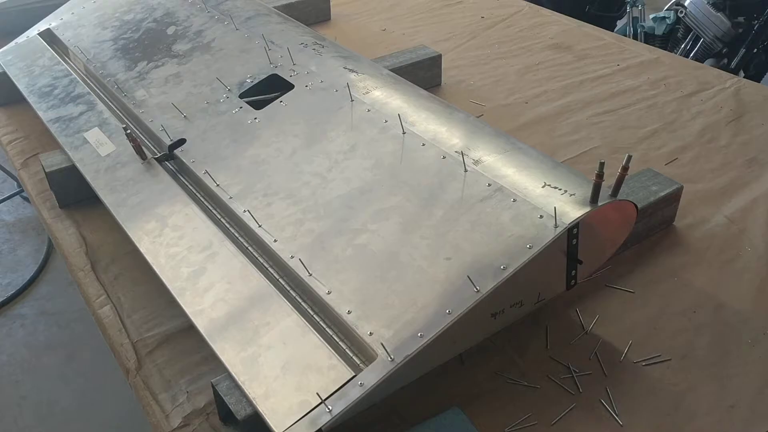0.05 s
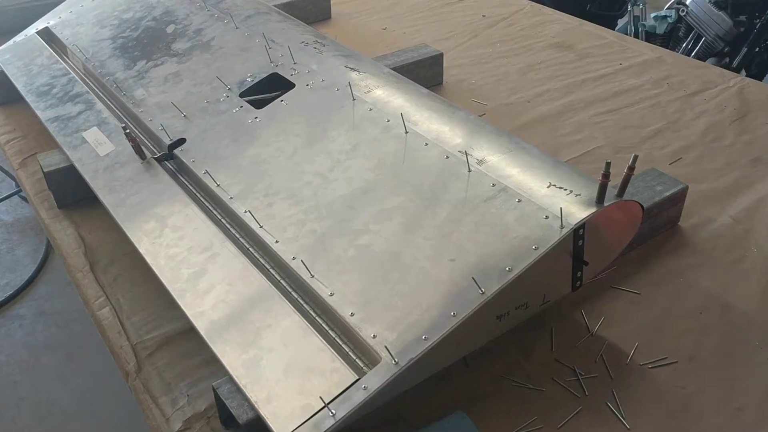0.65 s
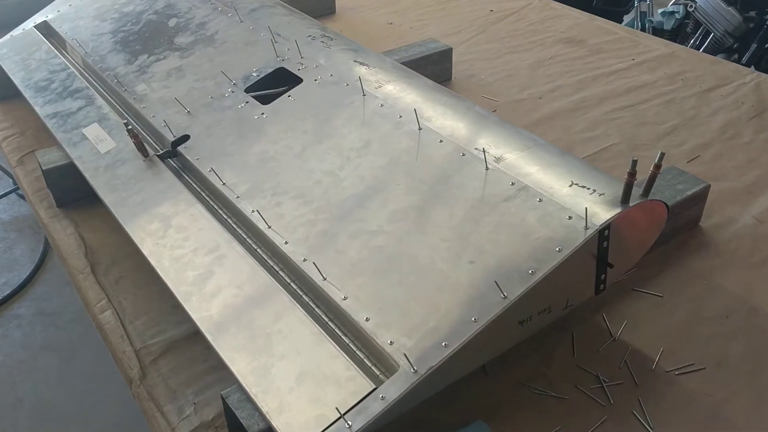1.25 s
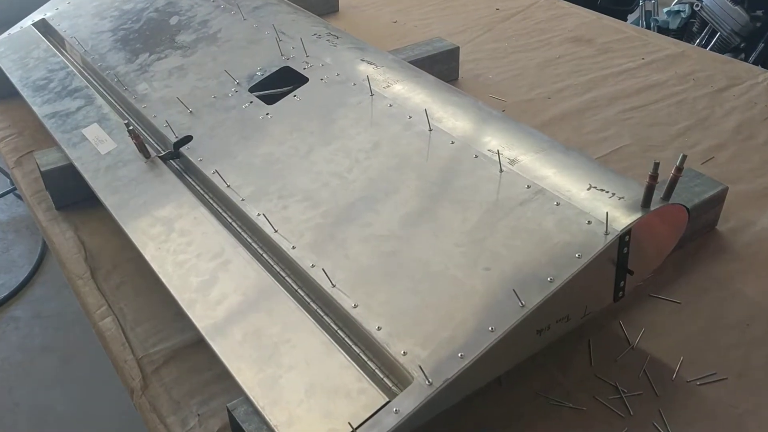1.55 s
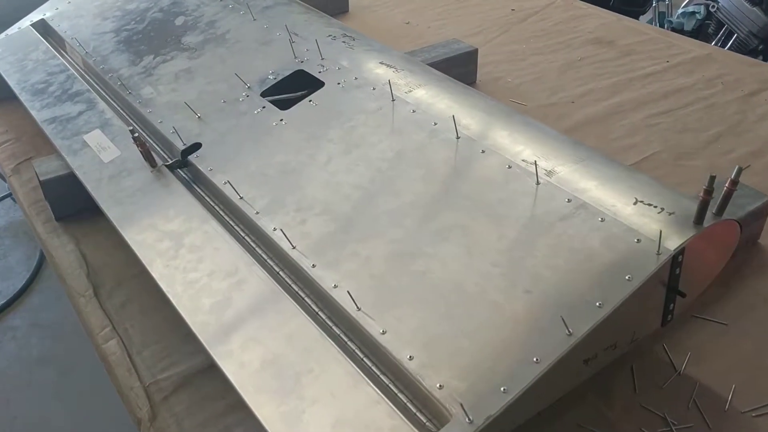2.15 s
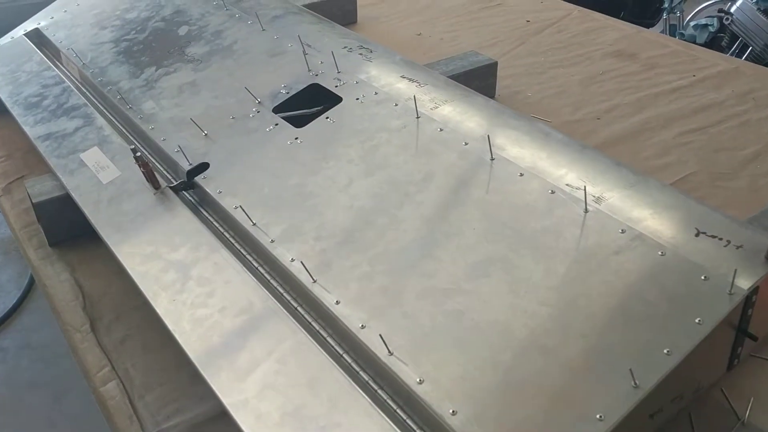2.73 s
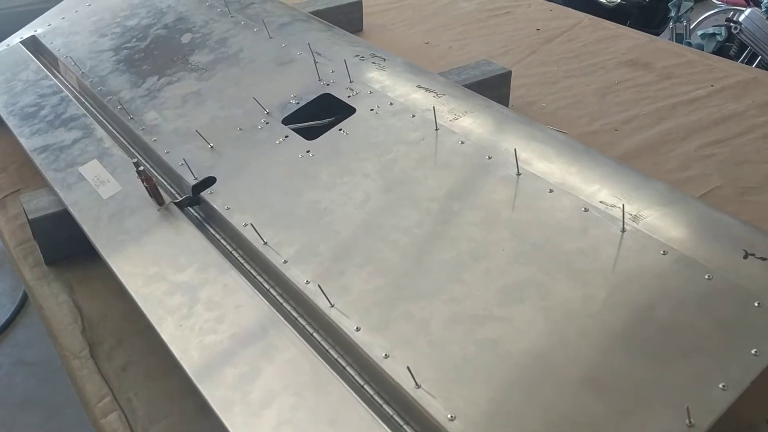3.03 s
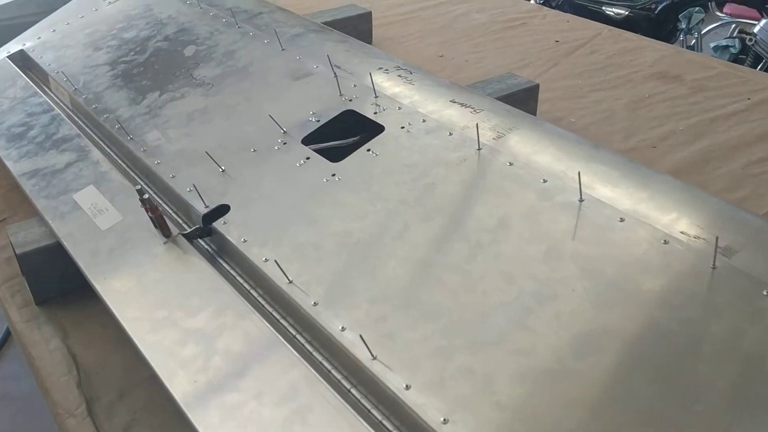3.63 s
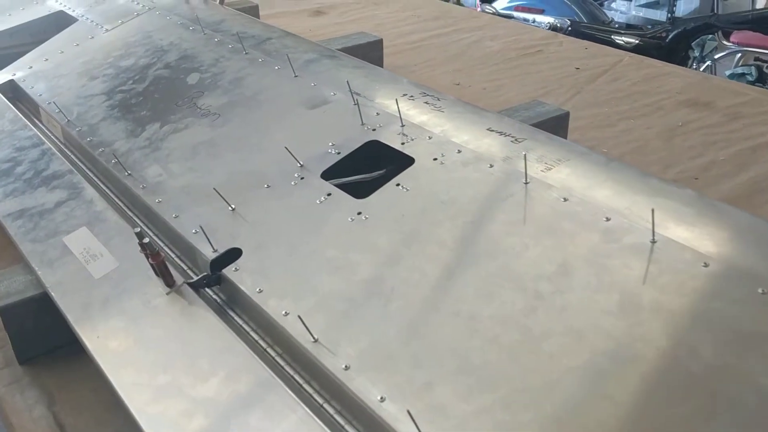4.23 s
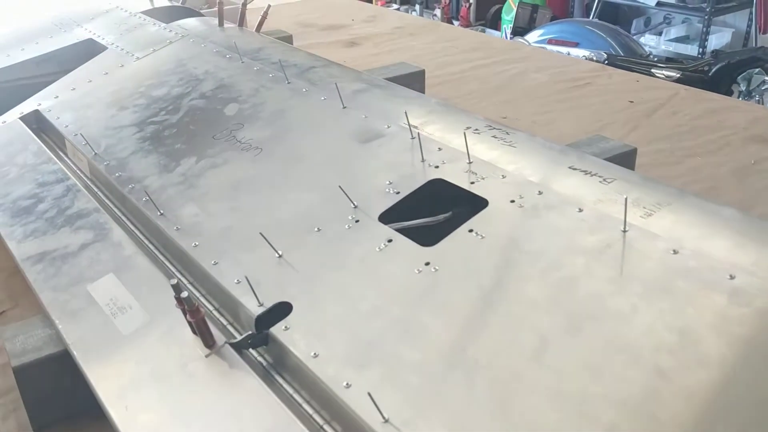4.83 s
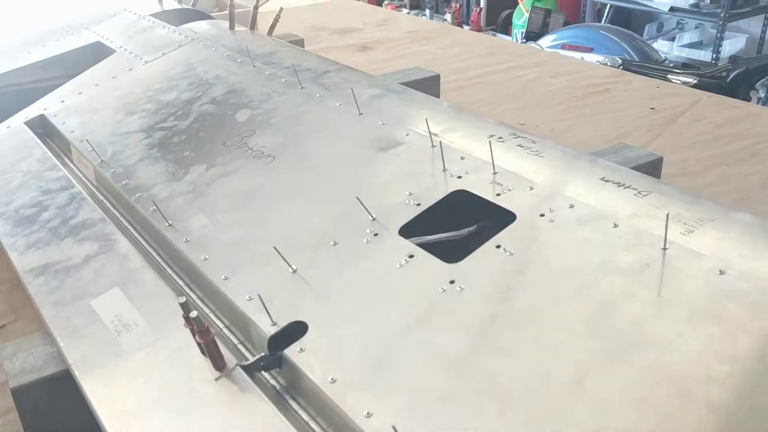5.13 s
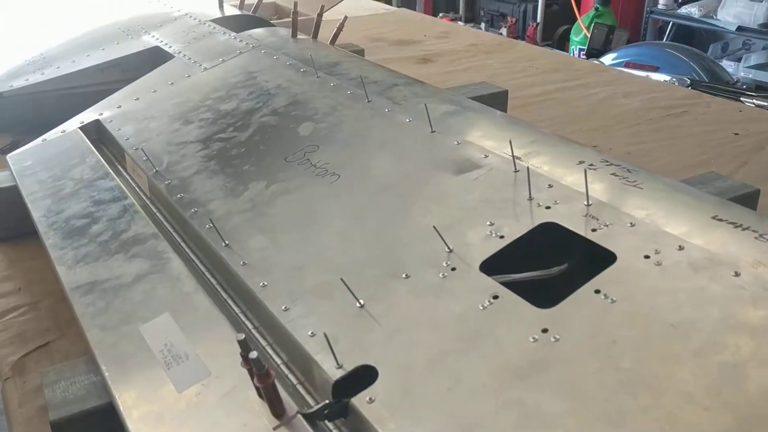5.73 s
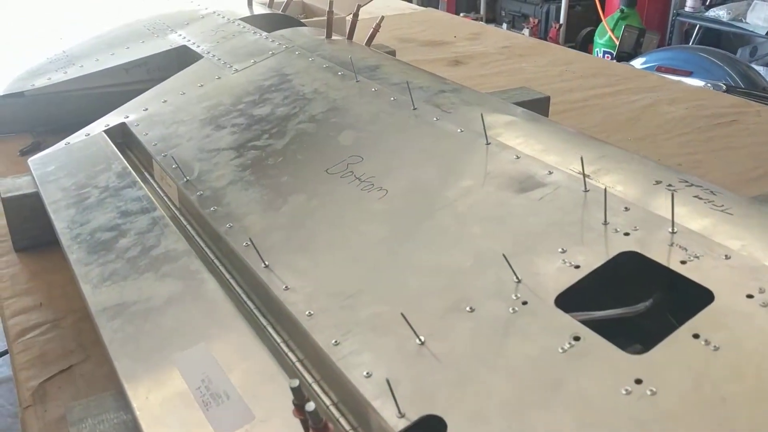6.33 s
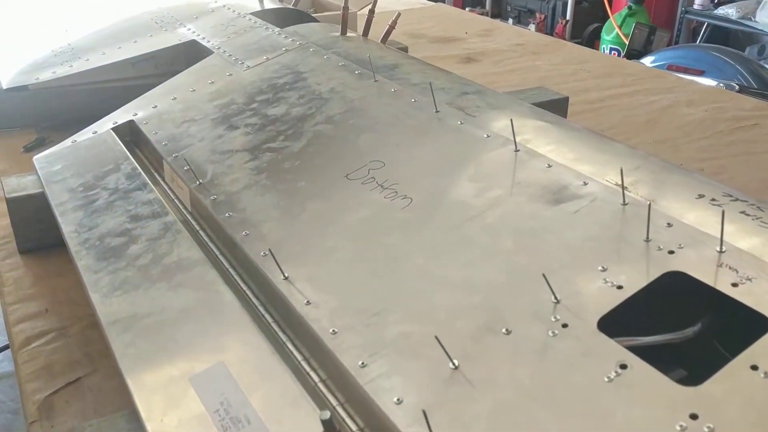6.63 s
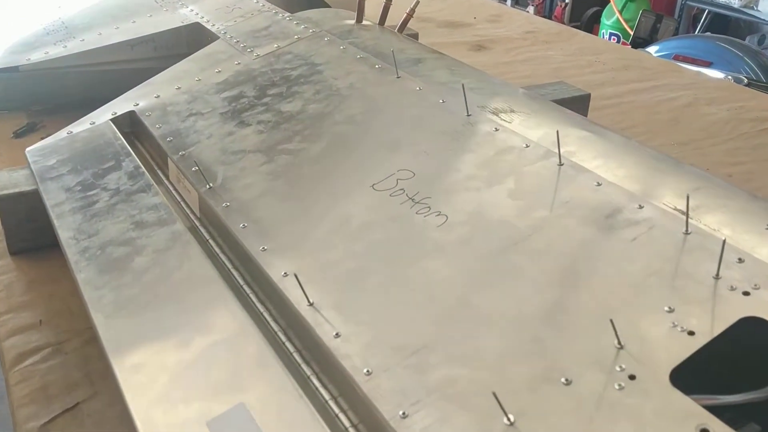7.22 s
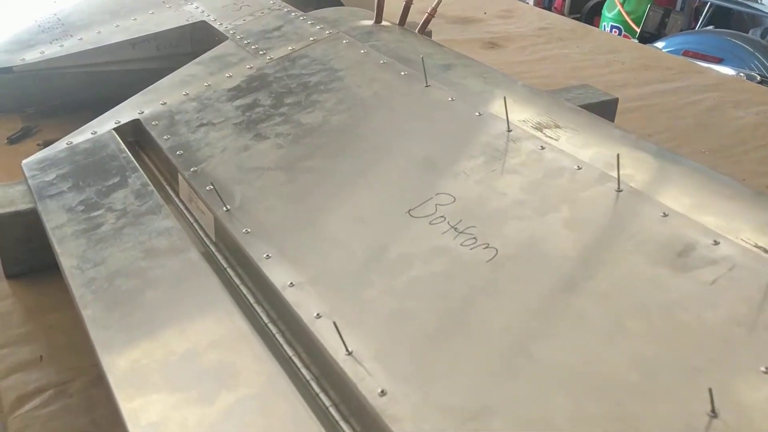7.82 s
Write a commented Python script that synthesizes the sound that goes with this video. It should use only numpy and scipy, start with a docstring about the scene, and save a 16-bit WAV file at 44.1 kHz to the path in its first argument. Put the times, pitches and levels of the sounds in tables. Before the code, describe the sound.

In a workshop, an air compressor runs at constant speed, humming and rattling over a hiss of air and a faint motor whine.

```python
"""A workshop: a piston air compressor at steady speed, heard by a slowly carried microphone.
Each stroke repeats a pump throb and valve clatter: a comb of shaft orders, coloured by the housing.
Behind it, a rush of intake and cooling air, mains hum and a faint motor whine.
Each order sets up standing waves in the room, so tones swell and fade singly as the microphone moves."""
import sys
import numpy as np
from scipy import signal
from scipy.fft import irfft
from scipy.io import wavfile
from scipy.ndimage import uniform_filter1d, map_coordinates

SR = 44100
rng = np.random.default_rng(int(sys.argv[2]) if len(sys.argv) > 2 else 0)


def store_pcm(level_fs):
    """Save levels as 16-bit WAV."""
    pcm = np.round(np.clip(level_fs, -1, 1) * 32767).astype(np.int16)
    wavfile.write(sys.argv[1], SR, np.atleast_2d(pcm).T)


N = 351477
TIME_S = np.arange(N) / SR
STEPS_S = np.arange(0, N / SR + .04, 1 / 40)  # control grid
SHAFT_HZ, WALK_M_PER_S = 45.457, .25

# Intake and cooling air. Each row: frequency in Hz, base density in dB per Hz.
AIR_SPECTRUM = [(20, -93), (60, -84), (180, -82), (350, -85.5), (750, -80.5), (1100, -77), (1700, -70),
                (2650, -73.5), (3800, -72), (5500, -80), (6900, -81), (7600, -76), (10000, -85),
                (15000, -90)]
# Mains hum and motor whine. Each row: frequency in Hz, level in dB rms.
MOTOR_TONES = [(120, -66.5), (529, -62), (793, -57), (1102, -61.5), (1143, -52.5), (1333, -51.5),
               (1585, -46.5), (1630, -51.5), (1849, -50.5), (1894, -51.5)]
# Main tank and pump housing resonances. Each row: centre in Hz, width in Hz.
MAIN_RESONANCES = [(1870, 52), (3250, 115), (3850, 530)]
# Their swell at the microphone. Each row: time in seconds, three levels in dB (used about their means).
MAIN_SWELLS = [(0.15, -37, -42, -35.5), (0.34, -37.5, -41.5, -35.5), (1.32, -37, -41, -38),
               (1.44, -38.5, -37.5, -36.5), (1.98, -40, -46, -32), (2.03, -42, -39.5, -33.5),
               (2.37, -38.5, -40.5, -33.5), (2.98, -43, -37, -34), (3.17, -39.5, -40, -33),
               (3.86, -36.5, -41, -35), (4.6, -42.5, -42, -32.5), (4.92, -41, -45.5, -33),
               (5.29, -39, -38.5, -33.5), (6.11, -39, -40, -33.5), (6.43, -38, -43, -34),
               (6.97, -40.5, -39.5, -32.5), (7.27, -40, -35.5, -34), (7.9, -40.5, -36.5, -34.5)]
# Higher resonances. Each row: centre in Hz, width in Hz, base depth of a random swell in dB.
HIGH_RESONANCES = [(5170, 220, 2.2), (7600, 400, 2)]
# Crank speed. Each row: time in seconds, turns per second.
CRANK_SPEED = [(0.4, 45.43), (1.4, 45.47), (2.4, 45.44), (3.6, 45.46), (4.8, 45.48), (5.8, 45.46),
               (6.5, 45.47), (7.0, 45.4), (7.7, 45.42)]
# Low orders standing between the walls. Each row: order, crest level in dB rms,
# node position on the path in metres, node to crest in metres, node depth in dB.
STANDING_ORDERS = [(2, -36.5, .3, 2.4, 27), (3, -52, .02, 1.8, 7.5), (4, -36.5, 1.42, 1.01, 9),
                   (5, -46.5, 0.26, 1.6, 13), (7, -52.5, 0.46, 0.85, 8.5), (10, -51.5, 1.92, 1.17, 13),
                   (11, -54.5, 0.23, 0.96, 13), (12, -49.5, .08, 1.32, 7), (13, -54, .05, 1.16, 10),
                   (15, -49, 0.63, 0.42, 17), (16, -51, 1.62, 1.04, 31), (19, -55, 2.26, 1.4, 32),
                   (20, -47.5, 1.46, 0.54, 5), (22, -44.5, 0.094, 0.95, 7)]
# Other orders of the throb. Each row: order, base level in dB.
THROB_ORDERS = [(1, -55), (6, -56), (8, -57.5), (9, -63), (14, -57.5), (17, -53.5), (18, -65.5)]
# Orders the housing rings with. Each row: order, base level in dB.
RINGING_ORDERS = [(32, -48.5), (35, -52.5), (38, -45), (41, -43.5), (42, -40.5), (43, -48), (46, -49),
                  (50, -46), (72, -43), (76, -49), (77, -50.5), (79, -44.5), (80, -46.5), (82, -44),
                  (84, -45.5), (85, -43), (86, -44), (89, -42), (94, -46.5), (110, -50)]
# Valve clatter on the remaining orders. Each row: frequency in Hz, base level per order in dB.
CLATTER_SPECTRUM = [(950, -62.5), (1550, -50.5), (2600, -56.5), (3050, -51), (4250, -50), (4700, -57.5),
                    (5150, -53.5), (5450, -82), (5850, -57.5), (6250, -71.5), (7000, -67), (7550, -56.5),
                    (8200, -64.5), (11000, -75.5)]
# Half orders from unequal alternate strokes. Each row: frequency in Hz, base level per line in dB.
HALF_ORDER_SPECTRUM = [(500, -85), (1000, -82), (1400, -65), (1850, -66), (2150, -57.5), (2600, -86),
                       (3500, -80), (5000, -68), (9000, -88)]
# Valve closures. Each row: crank angle in turns, Gaussian width in turns, relative clatter rise in dB.
VALVE_CLOSURES = [(0.02, .09, 2.5), (.42, 0.11, 2)]


def gain_of(db):
    """Decibels to amplitude."""
    return 10 ** (np.asarray(db) / 20)


def unit_rms(x):
    """Each column scaled to rms 1."""
    return x / np.sqrt(np.mean(abs(x) ** 2, axis=0) + 1e-20)


def spectrum_db(rows, hz):
    """Levels interpolated over log frequency."""
    row_hz, db = np.transpose(rows)
    return np.interp(np.log(hz + 1), np.log(row_hz + 1), db)


def follow(rows, times_s):
    """Table columns interpolated over time."""
    row_s, *columns = np.transpose(rows)
    return [np.interp(times_s, row_s, column) for column in columns]


def room_field(hz, direct_floor=0.47, corner_hz=550):
    """Complex gain (steps x tones) at a microphone moving through reflections from all sides."""
    direction, phase = rng.random((2, 12, 1, len(hz)))
    path_wavelengths = WALK_M_PER_S * STEPS_S[:, None] * hz / 343
    echoes = unit_rms(np.exp(2j * np.pi * (phase + (2 * direction - 1) * path_wavelengths)).sum(0))
    # long waves hardly change over the path
    direct_share = np.clip(direct_floor + (1 - direct_floor) / (1 + (hz / corner_hz) ** 2), 0, 1)
    direct = np.exp(2j * np.pi * rng.random(len(hz)))
    return unit_rms(np.sqrt(direct_share) * direct + np.sqrt(1 - direct_share) * echoes)


def standing_wave(crest_db, node_m, node_to_crest_m, depth_db):
    """One tone's amplitude along the path: a sine in space, nodes partly filled."""
    swing = np.sin(np.pi / 2 * (WALK_M_PER_S * STEPS_S - node_m) / node_to_crest_m) ** 2
    return gain_of(crest_db) * np.sqrt(swing + (1 - swing) * gain_of(-depth_db) ** 2)


def swell(count=12):
    """Slow random rise and fall, rms 1."""
    rates_hz = np.geomspace(0.47, 2.9, count)
    return unit_rms(np.sin(2 * np.pi * (rates_hz * STEPS_S[:, None] + rng.random(count))).sum(1))


def housing_resonances():
    """Tank and housing bands: centre in Hz, width in Hz, swell in dB per step."""
    levels_db = follow(MAIN_SWELLS, STEPS_S)
    main = [(hz, width_hz, db - db.mean()) for (hz, width_hz), db in zip(MAIN_RESONANCES, levels_db)]
    return main + [(hz, width_hz, db * swell()) for hz, width_hz, db in HIGH_RESONANCES]


def housing_db(resonances, times_s, hz):
    """Spectral rise and fall (times x frequencies), one bell curve per resonance."""
    return sum(np.interp(times_s, STEPS_S, db)[:, None] * np.exp(-.5 * ((hz - centre_hz) / width_hz) ** 2)
               for centre_hz, width_hz, db in resonances)


def air_rush(turns, resonances, housing_share=0.19, flicker_db=1.03, stroke_db=0.36, valve_db=0.14):
    """Turbulent air, puffing with each stroke and with the intake and exhaust valves."""
    hz, frames_s, noise = signal.stft(rng.standard_normal(N), SR, nperseg=2048)
    db = spectrum_db(AIR_SPECTRUM, hz)[:, None] + housing_share * housing_db(resonances, frames_s, hz).T
    db += flicker_db * rng.standard_normal(len(frames_s))
    rush = signal.istft(noise * gain_of(db), SR, nperseg=2048)[1][:N] * np.sqrt(SR / 2)
    puffs_db = stroke_db * np.cos(2 * np.pi * turns) + valve_db * np.cos(4 * np.pi * turns)
    return rush * gain_of(puffs_db)


def motor_whine():
    """Hum and thin motor tones, out of step with the piston, heard through the room."""
    hz, db = np.transpose(MOTOR_TONES)
    gains = room_field(hz) * gain_of(db) * np.sqrt(2)
    return sum((np.interp(TIME_S, STEPS_S, gain) * np.exp(2j * np.pi * tone_hz * TIME_S)).real
               for tone_hz, gain in zip(hz, gains.T))


def band_power(lines):
    """Mean power over 21 neighbouring lines."""
    return uniform_filter1d(abs(lines) ** 2, size=21, axis=1) + 1e-14


def shaft_lines(hz, resonances, ragged_db=3.5):
    """Complex amplitudes (steps x half orders) of the crank's tones at the microphone."""
    whole_order = np.arange(len(hz)) % 2 == 0
    db = np.where(whole_order, spectrum_db(CLATTER_SPECTRUM, hz), spectrum_db(HALF_ORDER_SPECTRUM, hz))
    # small modes of the casting favour some high orders
    db += ragged_db * rng.standard_normal(len(hz)) * np.clip(hz / 7000, 0, 1)
    strong = np.zeros(len(hz), bool)
    for order, order_db in THROB_ORDERS + RINGING_ORDERS:
        db[round(2 * order)] = order_db
        strong[round(2 * order)] = True
    # strong orders come more directly from the housing and swell most with it
    level = gain_of(db + np.where(strong, 1.78, 0.43) * housing_db(resonances, STEPS_S, hz))
    field = room_field(hz, direct_floor=np.where(strong, 0.53, .27))
    standing = [round(2 * row[0]) for row in STANDING_ORDERS]
    level[:, standing] = 0
    # neighbours fade in turn; each band keeps its power
    lines = level * field * np.sqrt(band_power(level) / band_power(level * field))
    for k, (_, *wave) in zip(standing, STANDING_ORDERS):
        lines[:, k] = standing_wave(*wave) * np.exp(1j * np.angle(field[:, k]))
    return lines


def crank_wave(lines, turns, size=8192):
    """Half orders summed to a two-turn cycle per step, read at the crank angle."""
    cycles = irfft(lines, size, axis=1) * size / np.sqrt(2)
    step = np.interp(TIME_S, STEPS_S, np.arange(len(STEPS_S)))
    return map_coordinates(cycles, [step, turns / 2 % 1 * size], order=1, mode="grid-wrap")


def pump(turns, resonances, split_hz=1200, dropout_s=5.422, dropout_shift_turns=.06):
    """Piston throb below the split; above it, clatter that peaks as each valve shuts."""
    hz = np.arange(600) / 2 * SHAFT_HZ
    lines = shaft_lines(hz, resonances) * (hz > 0)
    # a brief dropout, heard as one soft low bump
    dropout_shift = dropout_shift_turns * np.clip((TIME_S - dropout_s) / .004, 0, 1)
    throb = crank_wave(lines * (hz <= split_hz), turns + dropout_shift)
    clatter = crank_wave(lines * (hz > split_hz), turns)
    slaps_db = sum(db * np.exp(-.5 * (((turns - angle + .5) % 1 - .5) / width) ** 2)
                   for angle, width, db in VALVE_CLOSURES)
    return throb + unit_rms(gain_of(slaps_db)) * clatter


def scene():
    """The compressor at one microphone, both channels alike."""
    turns = np.cumsum(follow(CRANK_SPEED, TIME_S)[0]) / SR
    resonances = housing_resonances()
    return np.tile(pump(turns, resonances) + motor_whine() + air_rush(turns, resonances), (2, 1))


def record(dry, start_s=.072, fade_s=0.018, bass_s=0.37, bass_hz=95, early_bass_db=-13, top_hz=15850):
    """Quick fade-in, deep bass filling out a moment later, band limit."""
    thin = signal.sosfiltfilt(signal.butter(2, bass_hz, "high", fs=SR, output="sos"), dry)
    bass_gain = np.clip((TIME_S - bass_s) / fade_s + .5, gain_of(early_bass_db), 1)
    fade_in = np.clip((TIME_S - start_s) / fade_s, 0, 1)
    sound = (thin + (dry - thin) * bass_gain) * fade_in
    lowpass = signal.firwin(511, top_hz, window=("kaiser", 9), fs=SR)
    return signal.oaconvolve(sound, lowpass[None], "same")


dry = scene()
out = record(dry)
store_pcm(out)
```